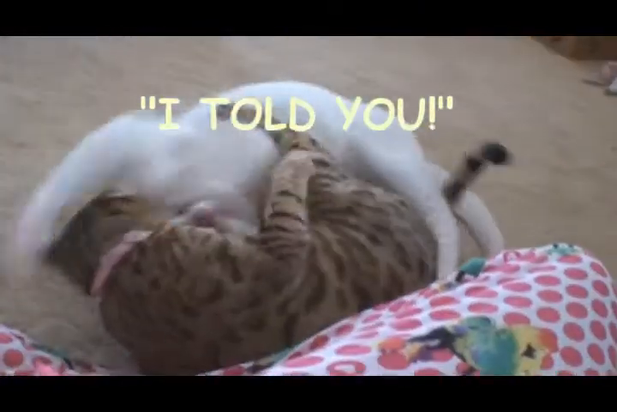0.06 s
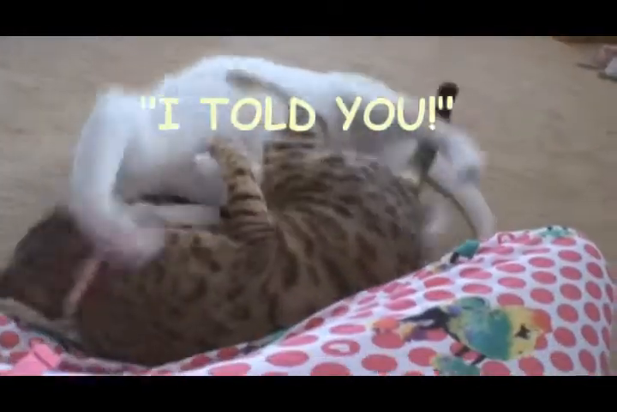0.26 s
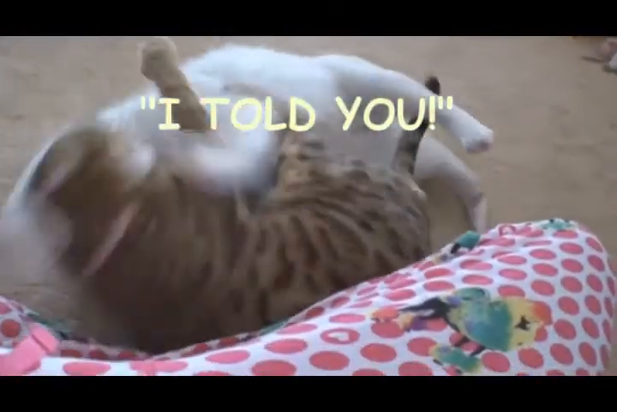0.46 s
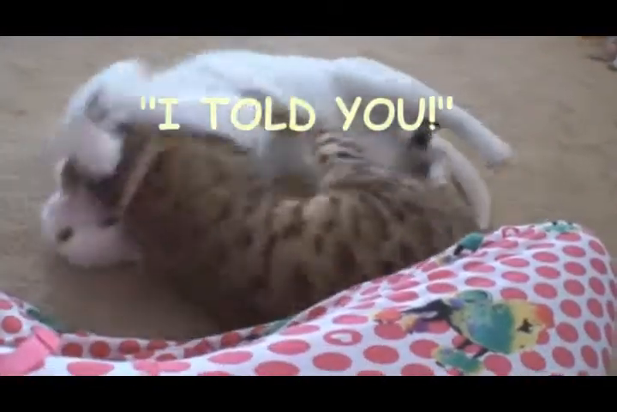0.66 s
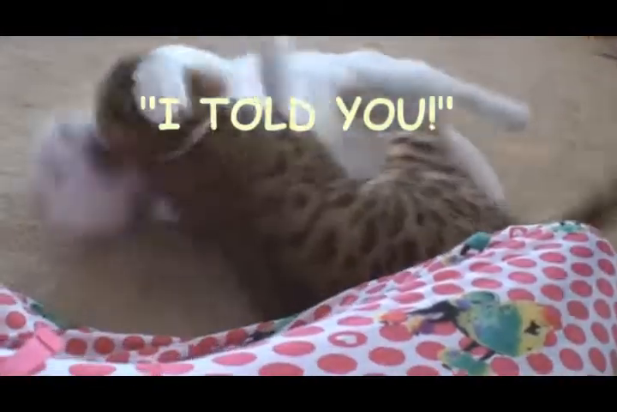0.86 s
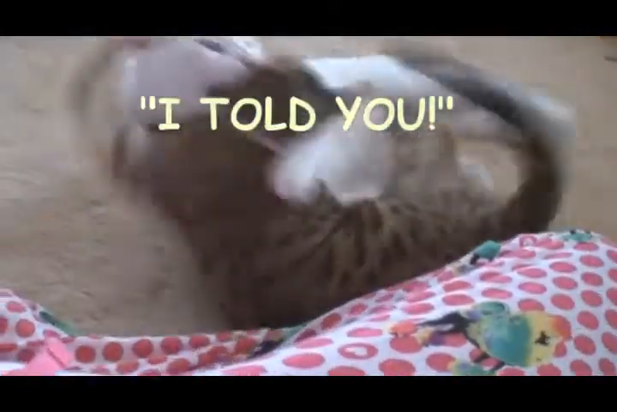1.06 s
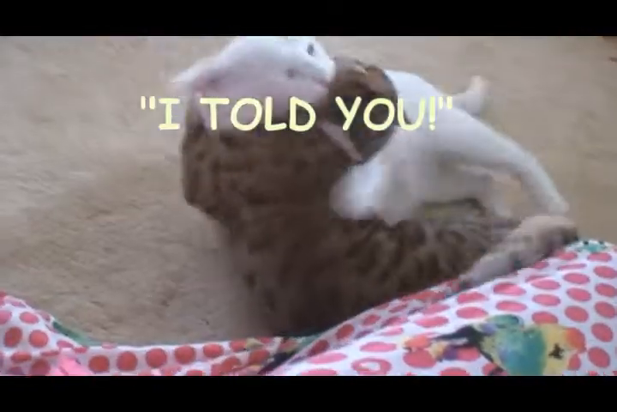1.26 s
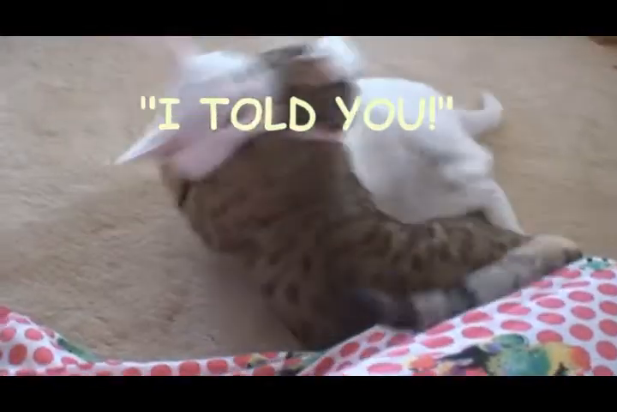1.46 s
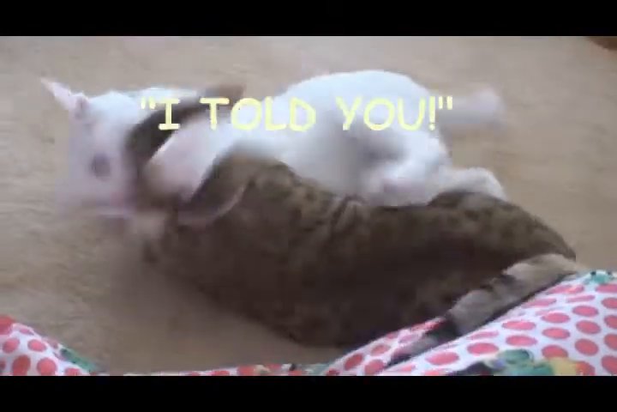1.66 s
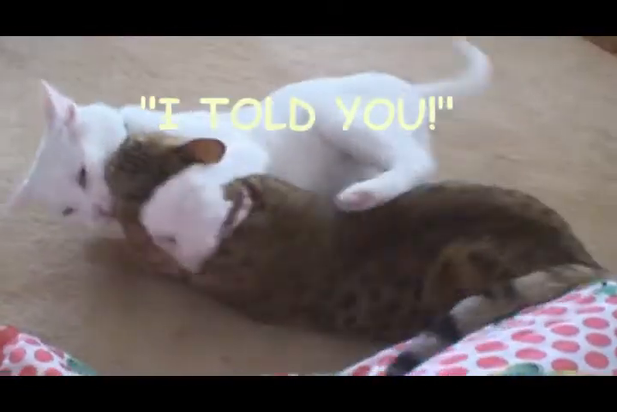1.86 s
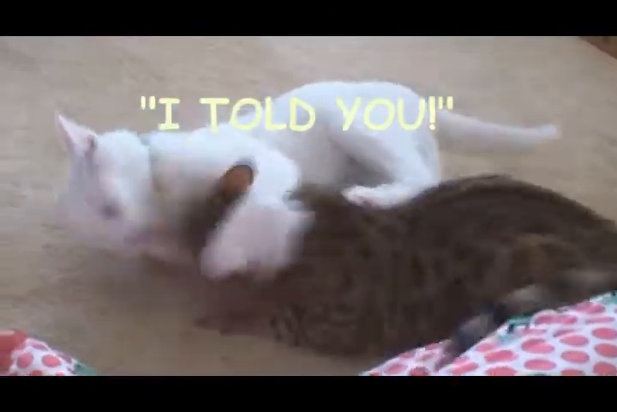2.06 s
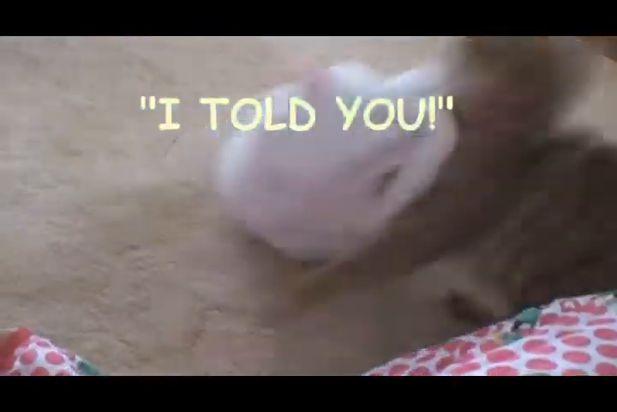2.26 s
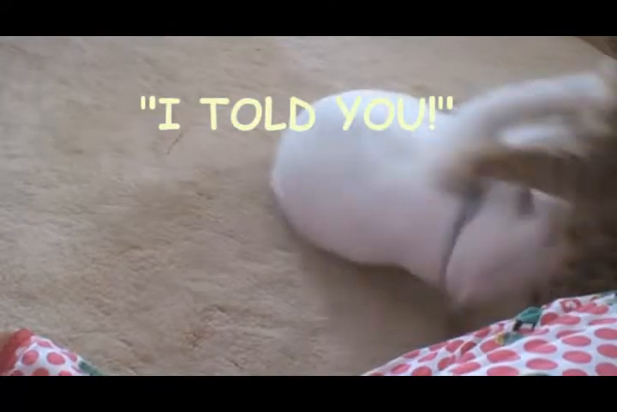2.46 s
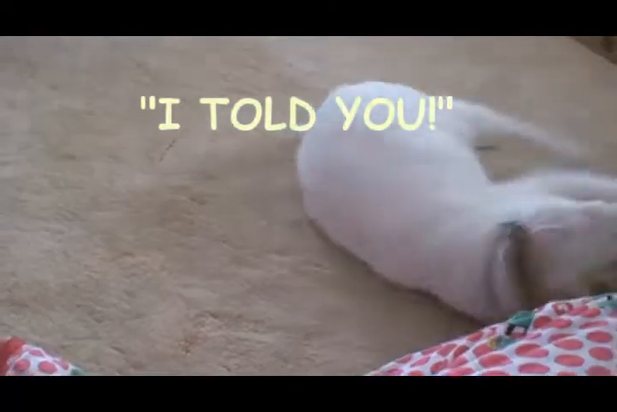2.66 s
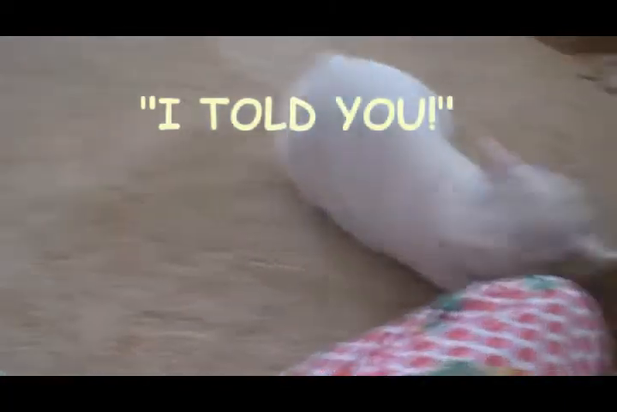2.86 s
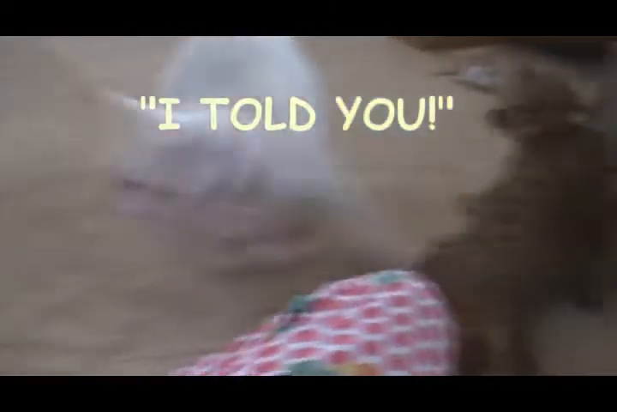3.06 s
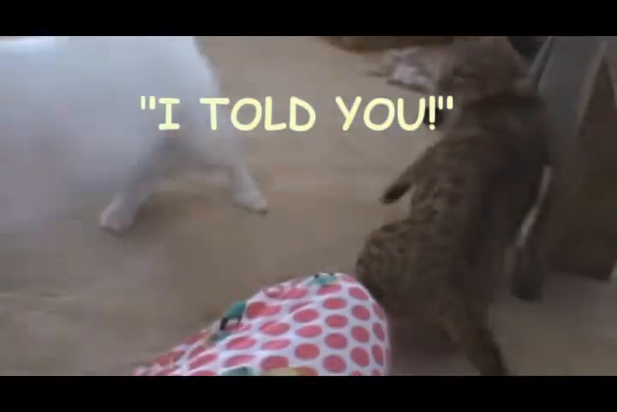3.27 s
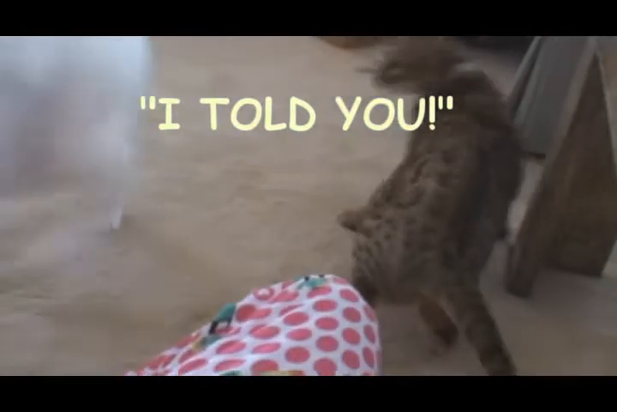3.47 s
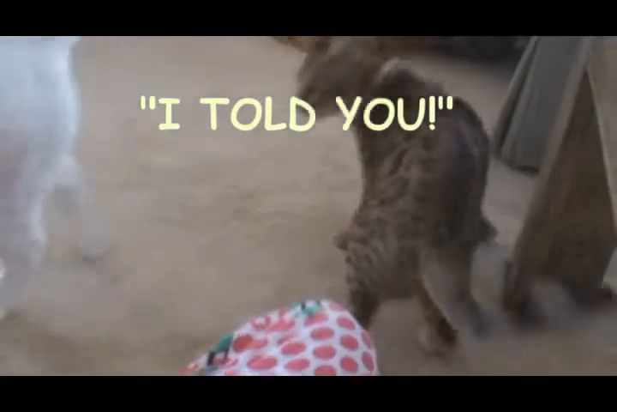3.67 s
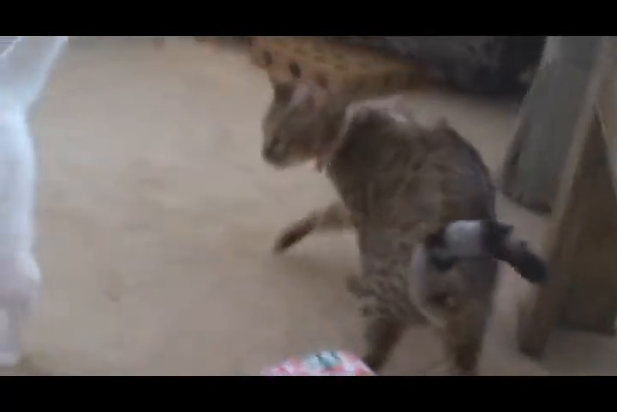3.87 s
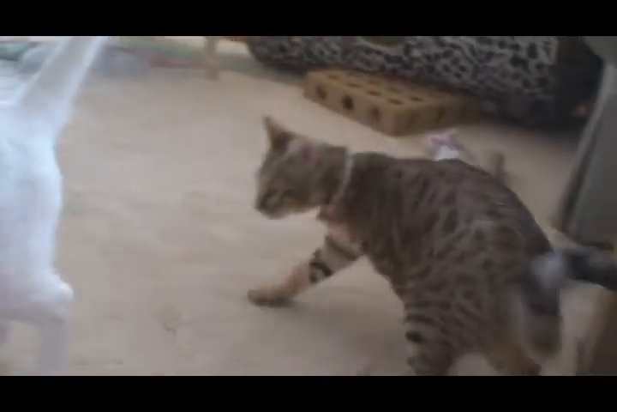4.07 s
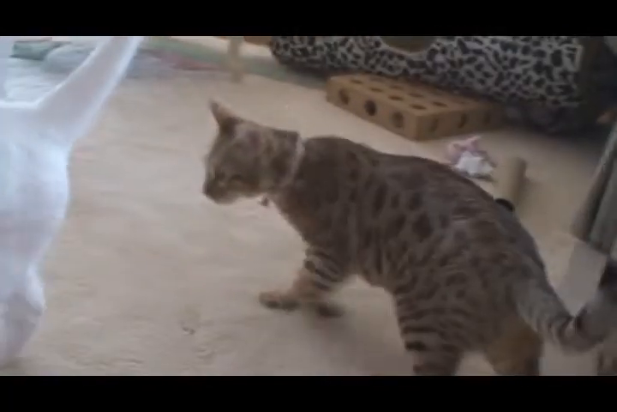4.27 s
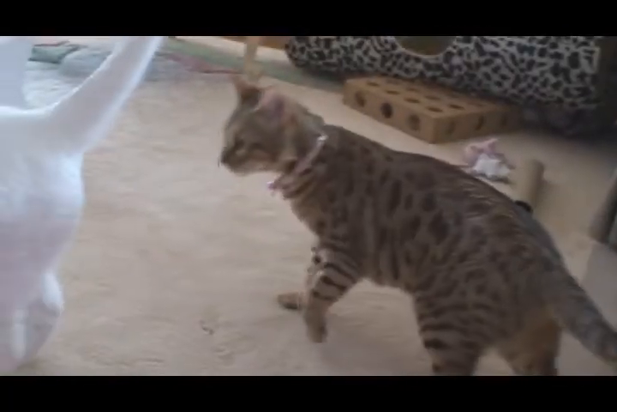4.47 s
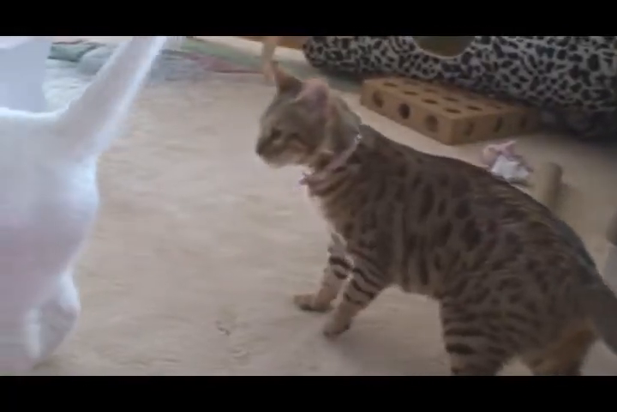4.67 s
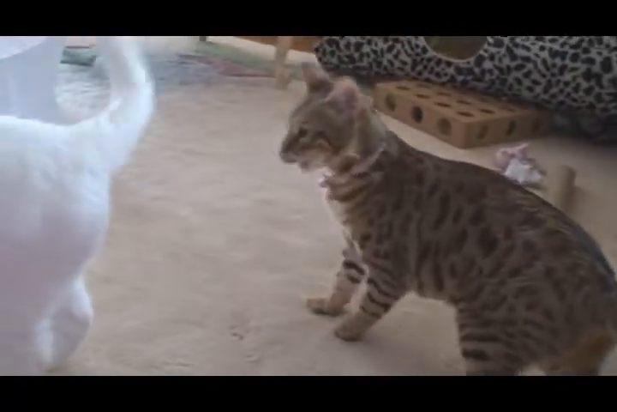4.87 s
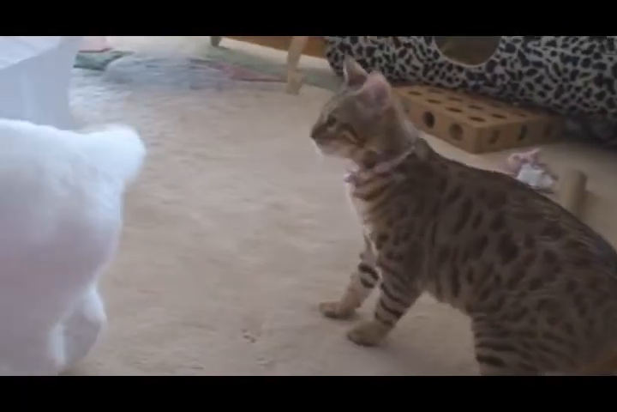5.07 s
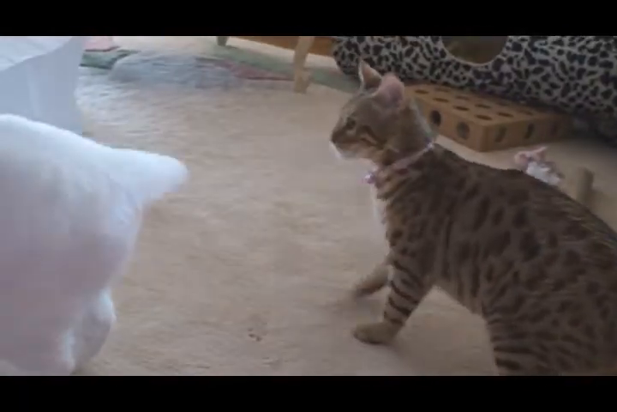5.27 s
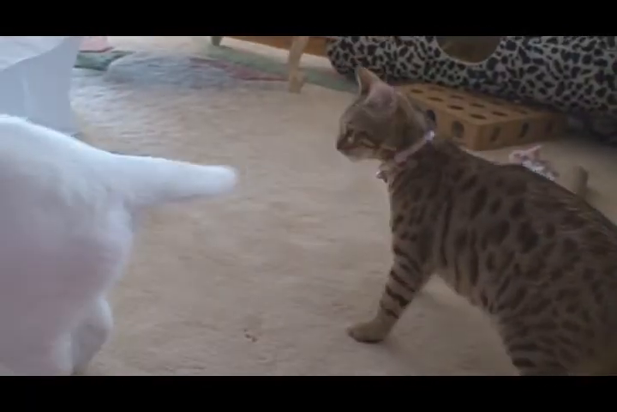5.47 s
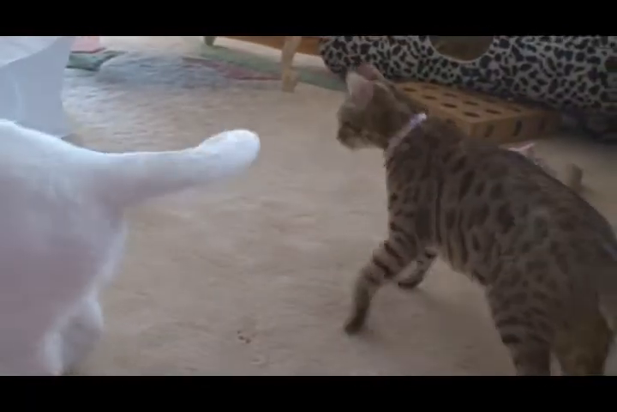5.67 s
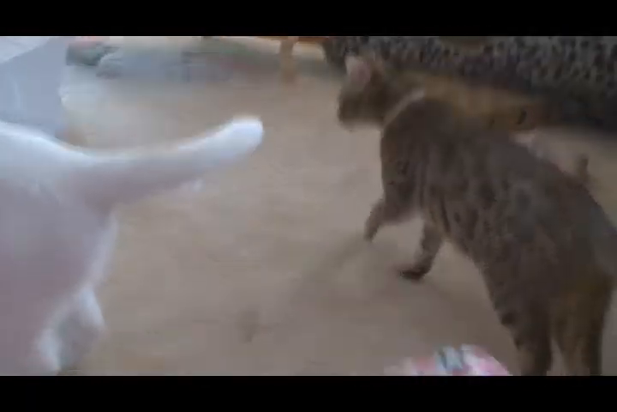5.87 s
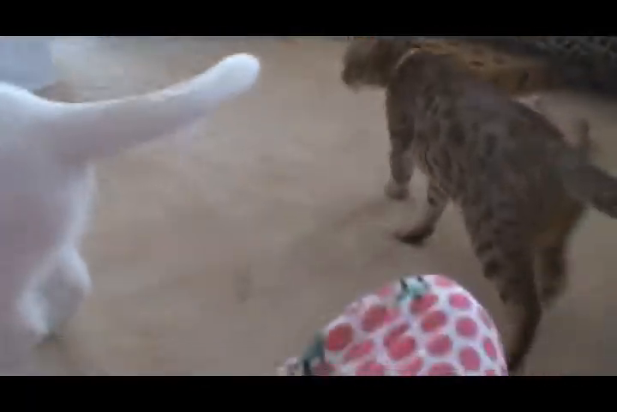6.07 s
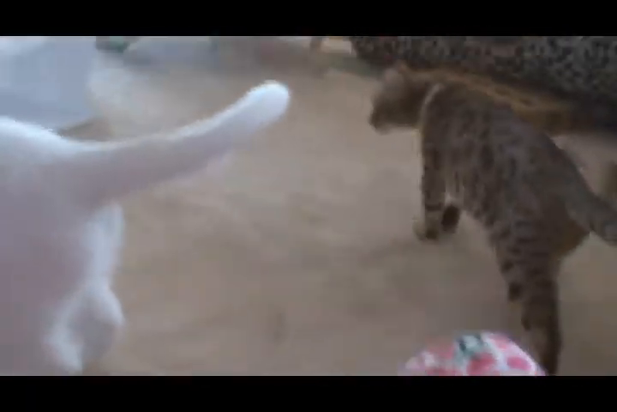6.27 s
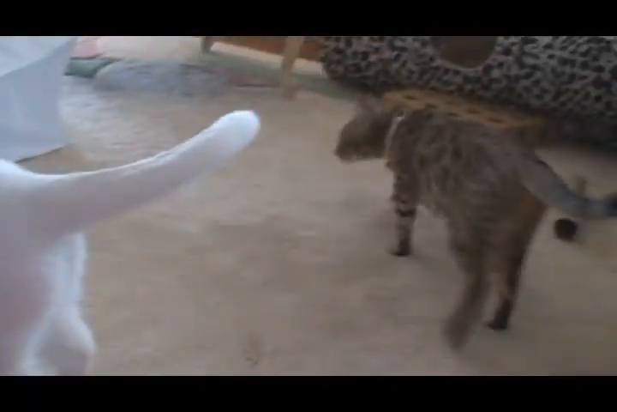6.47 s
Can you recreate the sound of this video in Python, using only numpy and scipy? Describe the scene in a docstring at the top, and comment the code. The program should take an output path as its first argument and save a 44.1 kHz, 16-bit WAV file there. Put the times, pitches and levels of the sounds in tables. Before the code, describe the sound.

Two cats wrestle on a carpet close to the microphone in a small room. A metal collar tag clinks lightly among fur rubbing, tiny claw snags and a sharp, hollow clack. The jingling grows louder and busier, then a body thumps the floor as they break apart. After a lull with a few faint clinks, the tag jingles brightly once more. A low hum and a faint fan run underneath.

```python
"""Cats wrestling on a carpet

Two cats wrestle close by in a small room. A metal collar tag strikes its ring, sings and
jiggles in bursts. Fur rubs the pile, claws snag and snap free, something hard clacks, and
a body thumps the floor as the cats break apart. A low hum and a faint fan fill the room."""
import sys
import numpy as np
from scipy import signal
from scipy.fft import rfft, irfft
from scipy.io import wavfile
from scipy.ndimage import uniform_filter1d

SR = 44100
rng = np.random.default_rng(int(sys.argv[2]) if len(sys.argv) > 2 else 0)


def master_out(mix):
    """Clip the mix to full scale and print it as 16-bit PCM to the path in sys.argv[1]."""
    frames = np.transpose(np.atleast_2d(mix))
    ceiling = np.clip(frames, -1, 1)
    pcm = np.round(ceiling * 32767).astype(np.int16)
    wavfile.write(sys.argv[1], SR, pcm)


N = 287046
TIME_S = np.arange(N) / SR
RING_TIME_S = np.arange(SR // 5) / SR
TAG_HZ = 4838  # main mode

# tag strikes, and two early room echoes of the loudest one (6 and 30 ms after it):
# t/s, main mode/dB, clang/dB, tick/dB, time until damped/s
STRIKES_AND_ECHOES = [(.189, -42.5, -43, -59, 0.018), (.3609, -30.5, -28, -58, 0.0026),
                      (.601, -36.5, -43, -51, 0.052), (.813, -47, -54, -54, 0.016),
                      (.853, -46, -50, -60, .024), (1.150, -38.5, -41, -66, 0.053),
                      (1.766, -31.5, -34, -62, .003), (1.926, -39, -44, -59, .0035),
                      (1.9474, -24, -27.5, -47, .0058), (1.96, -33.5, -51.5, -64, 0.061),
                      (2.35, -32.5, -26.5, -61, .0078), (2.4725, -18, -21, -58, 0.024),
                      (2.5019, -16.5, -20.5, -57, 0.0058), (2.6118, -25, -23, -22.5, 0.0023),
                      (2.627, -23.5, -24, -28, .064), (2.7485, -7.5, -13.5, -20, 0.0026),
                      (2.7547, -17, -17, -27, 0.0032), (2.7785, -29.5, -34.5, -35, .025),
                      (2.8353, -24, -23.5, -40.5, 0.017), (3.0496, -37, -47, -60.5, .006),
                      (3.2047, -25, -25.5, -44, 0.0056), (3.2712, -32.5, -27.5, -46, 0.0059),
                      (3.363, -32, -32, -33, 0.0025), (3.3869, -26, -35, -27.5, 0.025),
                      (3.465, -25, -42, -56, 0.011), (3.4681, -21, -27, -44, 0.0058),
                      (3.652, -54, -43, -71, 0.00525), (3.718, -50, -48, -77, 0.0032),
                      (3.833, -48, -52, -58, 0.002), (4.091, -43, -46, -68.5, 0.002),
                      (4.3871, -40, -35, -51, 0.0033), (4.434, -41.5, -39, -60, 0.0029),
                      (4.47, -42, -42, -62, 0.0026), (5.385, -32.5, -37, -45, 0.047),
                      (5.423, -32.5, -45, -46, .058), (5.4736, -34, -45, -50, 0.0132),
                      (5.4969, -24.5, -27, -33, 0.0054), (5.5271, -13.5, -15.5, -28, 0.0035),
                      (5.538, -24.5, -28, -31.5, .041), (5.573, -19, -15, -47, 0.0092),
                      (5.605, -22, -37, -44, 0.0051), (5.6444, -25.5, -23.5, -43, 0.0063),
                      (5.72, -19, -19.5, -38, 0.0039), (5.819, -25, -28, -57, 0.0016),
                      (5.8376, -30, -27, -52, 0.0043), (6.047, -38.5, -38, -56, 0.0035)]
# claw snags: t/s, level/dB
CLAW_SNAGS = [(0.0617, -37.5), (0.1343, -33.5), (.191, -30.5), (.197, -34.5), (.293, -40), (0.4411, -26.5),
              (.5623, -30), (0.85, -37.5), (.927, -37), (1.753, -43), (2.365, -48), (2.451, -34.5),
              (2.593, -44), (2.6208, -24), (5.5113, -35), (6.033, -36.5)]
# lunges, rolls and steps: peak t/s, rise/s, fade/s, tag shaking/dB, fur rubbing/dB
CAT_MOVES = [(.02, 0.066, 0.17, -50, -68), (.58, 0.041, 0.51, -58, -59), (1.148, 0.06, .16, -54.5, -63),
             (1.93, 0.17, 0.37, -56.5, -65), (2.37, 0.049, 0.099, -45, -51), (2.63, 0.13, 0.12, -45, -49),
             (2.78, .02, 0.09, -46, -49), (3.08, 0.062, 0.065, -47, -54), (3.23, .02, 0.3, -57, -60.5),
             (4.13, 0.098, 0.155, -63.5, -70), (5.39, 0.056, 0.12, -44, -53),
             (5.55, 0.047, 0.11, -33, -43.5), (5.85, 0.029, 0.059, -39.5, -51),
             (6.08, 0.042, 0.082, -48, -58.5)]


def tag_clinks(t60_s=0.2, tick_s=0.0025, stop_s=0.00031, muffled=0.052, bite=0.15, bite_s=0.0022):
    """The tag hits its ring, ticks, clangs and sings until damped; the loudest hit echoes twice."""
    tick_spectrum = [(500, -39), (1400, -17), (2400, -5), (3500, -7), (6000, 2), (7500, -1.5), (8500, -4.5),
                     (9300, 0), (10400, -6.5), (11500, -1.5)]  # metal contact: f/Hz, level/dB
    collar_side = [(0, -9), (2.8, -11), (3.3, -6.5), (4.1, 3), (5.53, -0.5), (5.6, -6), (6, -7.5)]  # collar position: t/s, L-R/dB
    out = np.zeros((2, N))
    for s, main_db, clang_db, tick_db, free_s in STRIKES_AND_ECHOES:
        pan_db = np.interp(s, *np.transpose(collar_side))
        main = ring([(TAG_HZ, 0, t60_s)], detune=0.0015) * amp(main_db + 0.3)
        upper = tag_clang() * amp(clang_db - 0.5)
        tone = phase_panned(main, 0.15, pan_db - 0.5) + phase_panned(upper, 0.78, pan_db)
        damping = muffled + (1 - muffled) * np.exp(-np.maximum(RING_TIME_S - free_s, 0) / stop_s)
        swing = damping + bite * np.exp(-RING_TIME_S / bite_s)  # widest at the onset
        tick = burst(tick_spectrum, tick_s) * amp(tick_db + 5)
        add(out, s, swing * tone + panned(tick, -3))
    return out


def tag_clang():
    """The tag's upper modes, shifted by where the ring presses on it."""
    upper_modes = [(4720, -7, 0.024), (5170, -9, 0.041), (5140, 7, 0.049), (5154, -4.5, 0.026),
                   (5444, -0.5, 0.067), (5720, 1, 0.031), (5877, 0.5, 0.034), (6510, -14.5, 0.091),
                   (7420, -23, 0.064), (8760, -29, .05)]  # metal tag: f/Hz, level/dB, t60/s
    return ring(upper_modes, scatter_db=2.5, detune=0.014)


def tag_jiggle(gain_db=-1, clang_db=0.5, t60_s=0.044, spots=20):
    """The shaken tag chatters lightly against its ring, hit at many different spots."""
    out = np.zeros((2, N))
    for _ in range(spots):
        main = ring([(TAG_HZ, 0, t60_s)], detune=0.003)
        chink = phase_panned(main, 0.15, -3.5) + amp(clang_db) * phase_panned(tag_clang(), 0.46, -5.5)
        touches = contacts(per_s=14, spread_db=3)
        out += signal.oaconvolve(touches[None], chink[:, :SR // 10], axes=1)[:, :N]
    return amp(gain_db) * tag_shaking() * evened(out)


def tag_shaking(jolt_s=0.0066, rattle_db=-23, rattle_s=0.091):
    """Jiggle envelope: each move shakes the tag, and a rattle trails each strike or echo."""
    moves = sum((amp(db) * swell(s, rise_s, fade_s)) ** 2 for s, rise_s, fade_s, db, _ in CAT_MOVES)
    rattles = sum((amp(clang_db + rattle_db) * swell(s + jolt_s, jolt_s, rattle_s)) ** 2
                  for s, _, clang_db, _, _ in STRIKES_AND_ECHOES)
    return np.sqrt(moves + rattles)


def collar_slides(t60_s=0.014):
    """The small ring scrapes along its loop and sings above the tag's main mode."""
    slides = [(0.533, 0.073, -58, 6130), (0.609, 0.082, -53, 6230), (0.679, 0.066, -47, 6270),
              (0.743, .12, -59, 6100), (1.07, 0.036, -60, 5600), (1.14, 0.11, -56, 5960),
              (1.863, 0.055, -50.5, 6120), (2.461, 0.037, -43, 5950), (2.561, .02, -42, 5950),
              (2.602, 0.021, -43, 6030), (2.87, .025, -44.5, 6380)]  # ring scrapes: peak t/s, length/s, level/dB, f/Hz
    out = np.zeros(N)
    for s, length_s, db, hz in slides:
        t = np.arange(-1.5 * length_s, 1.2 * length_s, 1 / SR)
        friction = rng.standard_normal(len(t))
        song = signal.oaconvolve(friction, ring([(hz, 0, t60_s)]).real)[:len(t)]
        add(out, s + t[0], amp(db) * evened(song) * np.exp(-(2 * t / length_s) ** 2))
    return panned(out, -4)


def carpet_scuffs(rub_db=2.5, snap_s=0.0011):
    """Fur and paws drag over the pile in fine grains; claws catch and snap free."""
    fur_spectrum = [(300, -17), (1000, -1), (2500, -3), (4000, 5), (6000, 7.5), (7500, 4), (9500, 0),
                    (11500, -10.5)]  # rubbed fur: f/Hz, level/dB
    snap_spectrum = [(800, -28), (2000, 3), (4500, 1), (7000, 1), (9300, 0), (11500, -3)]  # claw snap: f/Hz, level/dB
    grains = contacts(per_s=3000, spread_db=4.5)
    out = amp(rub_db) * carpet_rubbing() * evened(coloured(grains, fur_spectrum))
    for s, db in CLAW_SNAGS:
        add(out, s, amp(db) * burst(snap_spectrum, snap_s))
    return panned(out, -4.5)


def carpet_rubbing(grip_s=0.0044, drag_db=-23.5, drag_s=0.019):
    """Rub envelope: each move brushes the pile, and freed claws drag on after a snag."""
    moves = sum((amp(db) * swell(s, rise_s, fade_s)) ** 2 for s, rise_s, fade_s, _, db in CAT_MOVES)
    drags = sum((amp(db + drag_db) * swell(s + grip_s, grip_s, drag_s)) ** 2 for s, db in CLAW_SNAGS)
    return np.sqrt(moves + drags)


def clacks(gain_db=1):
    """A hard object is knocked and rings short and hollow; light touches sound lower."""
    knocks = [(0.1348, -31, 0.93), (0.4429, -12.5, 0.93), (.4535, -27, 0.74), (.728, -35, 0.558),
              (.757, -35, 0.576), (1.177, -34.5, 0.57)]  # hard knocks: t/s, level/dB, pitch ratio
    object_modes = [(490, -12, 0.026), (690, -16, 0.049), (880, -7, 0.019), (1207, 1, 0.023),
                    (1520, 3.5, 0.03), (1940, 3.5, 0.027), (2190, -9.5, 0.028), (3960, 0, 0.0079),
                    (5200, -4, 0.0072)]  # knocked object: f/Hz at ratio 1, level/dB, t60/s
    out = np.zeros(N)
    for s, db, pitch in knocks:
        modes = [(hz * pitch, mode_db, t60_s) for hz, mode_db, t60_s in object_modes]
        add(out, s, amp(db + gain_db) * ring(modes, rise_s=0.00041).real)
    return panned(out, 8.7)


def body_bumps(slap_s=0.0099):
    """A body lands on the right: a brief slap and a floor boom, duller the softer the push."""
    landings = [(1.175, -38, 150, -45.5), (1.572, -45, 130, -49.5), (2.512, -30.5, 125, -39),
                (2.54, -34.5, 110, -44), (2.978, -19.5, 640, -33), (2.994, -33, 800, -39),
                (3.016, -30, 1100, -30.5), (3.045, -32, 750, -37), (3.087, -55, 900, -39),
                (5.36, -35, 110, -61), (5.477, -34, 130, -59)]  # bodies and paws: t/s, boom/dB, push cutoff/Hz, slap/dB
    floor_modes = [(133, -3.5, 0.082), (164.4, -6, 0.14), (202, -5.5, 0.14), (251, 0, 0.14),
                   (293, 2.5, 0.15), (346, 6, 0.061), (440, -8, 0.061), (523, -2.5, .12), (632, -1, 0.11),
                   (742, 1, 0.13)]  # floor: f/Hz, level/dB, t60/s
    slap_spectrum = [(100, -10), (250, 4.5), (420, 4.5), (700, -3), (1000, -1.5), (1600, -7.5),
                     (3000, -12.5), (8000, -47)]  # body brushing the carpet: f/Hz, level/dB
    out = np.zeros(N)
    for s, boom_db, cutoff_hz, slap_db in landings:
        modes = [(hz, db - 20 * np.log10(1 + (hz / cutoff_hz) ** 4), t60_s)
                 for hz, db, t60_s in floor_modes]
        boom = ring(modes, rise_s=0.0029).real
        slap = burst(slap_spectrum, slap_s)
        add(out, s, amp(boom_db) * boom + amp(slap_db) * slap)
    return panned(out, -18.5)


def reflections(x, first_s=0.0015, per_s=2500):
    """Sparse room echoes of random sign, each band dying at its own rate."""
    decay = [(150, 0.48), (1000, 0.077), (5000, 0.24), (12000, 0.22)]  # room decay: f/Hz, t60/s
    t = np.arange(SR // 2) / SR
    signs = rng.choice([-1., 1.], (2, len(t)))
    taps = signs * (rng.random(signs.shape) < per_s / SR) * (t > first_s)
    hz, frame_s, bands = signal.stft(taps, SR, nperseg=256)
    fade = amp(-60 * frame_s / value_at(decay, hz)[:, None])
    tail = signal.istft(bands * fade, SR, nperseg=256)[1]
    return signal.fftconvolve(x.mean(0)[None], tail / np.linalg.norm(tail[0]), axes=1)[:, :N]


def fan_and_hum(left_db=-50.5, right_db=-45.5, correlation=0.22):
    """Fan air, a wavering low hum and thin motor whines."""
    air_left = [(20, -18), (45, -5), (100, -3.5), (200, -1), (600, 0.5), (1000, -1), (1900, -5), (2600, -9),
                (4000, -14.5), (5200, -16.5), (7000, -20.5), (12000, -28.5)]  # fan air, left: f/Hz, level/dB
    air_right = [(20, -11), (45, 0.5), (80, 2.5), (160, 2), (330, 1.5), (550, -5.5), (900, -9),
                 (1500, -15.5), (4000, -21), (5200, -25.5), (7000, -30.5), (12000, -35)]  # fan air, right: f/Hz, level/dB
    hum_lines = [(58.9, -55, -22, 6.5), (119.3, -62.5, -27.5, 4.1), (234.93, -60, -28.5, 9.85),
                 (300.2, -95, -20, 4.4), (702, -69, 6, 2.5), (780, -66, 13, 2.2), (858, -67.5, 30, 0.95),
                 (1682, -66, 13.5, 3.4)]  # hum and whines: f/Hz, level/dB, L-R/dB, linewidth/Hz
    left, other = rng.standard_normal((2, N))
    right = correlation * left + np.sqrt(1 - correlation ** 2) * other
    out = np.array([amp(left_db) * coloured(left, air_left), amp(right_db) * coloured(right, air_right)])
    for hz, db, pan_db, width_hz in hum_lines:
        drift_rad = np.cumsum(rng.standard_normal(N)) * np.sqrt(np.pi * width_hz / SR)
        line = np.sin(2 * np.pi * hz * TIME_S + uniform_filter1d(drift_rad, size=2000))
        out += panned(amp(db) * evened(line), pan_db)
    return out


def ring(modes, scatter_db=0, detune=0, rise_s=0.00064):
    """Decaying modes as a normalised complex wave; level and pitch can scatter per blow."""
    hz, db, t60_s = np.transpose(modes)[:, :, None]
    weight, load = rng.standard_normal((2, *hz.shape))
    size = amp(db + scatter_db * weight)
    phasors = np.exp(2j * np.pi * (hz * (1 + detune * load) * RING_TIME_S + rng.random(hz.shape)))
    attack = 1 - np.exp(-(RING_TIME_S / rise_s) ** 2)
    decay = amp(-60 * RING_TIME_S / t60_s)
    return attack * (size * decay * phasors).sum(0) / np.linalg.norm(size)


def burst(spectrum, fade_s):
    """Noise puff: instant onset, exponential fade."""
    return coloured(rng.standard_normal(len(RING_TIME_S)), spectrum) * np.exp(-RING_TIME_S / fade_s)


def contacts(per_s, spread_db):
    """Random train of tiny, uneven impacts."""
    size = amp(spread_db * np.minimum(rng.exponential(1, N), 3)) * rng.choice([-1, 1], N)
    return size * (rng.random(N) < per_s / SR)


def swell(peak_s, rise_s, fade_s):
    """Motion envelope: Gaussian rise, exponential fade."""
    early_s, late_s = np.maximum(peak_s - TIME_S, 0), np.maximum(TIME_S - peak_s, 0)
    return np.exp(-np.minimum((early_s / rise_s) ** 2 + late_s / fade_s, 30))


def coloured(x, spectrum):
    """Shapes white noise to a spectrum at equal power."""
    gain = evened(amp(value_at(spectrum, np.fft.rfftfreq(len(x), 1 / SR))))
    return irfft(rfft(x) * gain, len(x))


def panned(x, pan_db):
    """Stereo split by L-R level, mean gain 1."""
    gains = amp([[pan_db], [0]])
    return x * gains / gains.mean()


def phase_panned(wave, lead_rad, pan_db):
    """Complex wave to stereo, left leading in phase."""
    return panned(np.array([wave * np.exp(1j * lead_rad), wave]).real, pan_db)


def amp(db):
    return 10 ** (np.asarray(db) / 20)


def evened(x):
    """Scales to unit RMS."""
    return x / np.sqrt(np.mean(x ** 2) + 1e-20)


def value_at(curve, hz):
    curve_hz, values = np.transpose(curve)
    return np.interp(np.log(hz + 1), np.log(curve_hz), values)


def add(mix, s, sound):
    part = mix[..., max(round(s * SR), 0):][..., :sound.shape[-1]]
    part += sound[..., :part.shape[-1]]


def scene(tag_room_db=-4, scuffle_room_db=-7.5, bump_room_db=-4):
    """Tag, scuffle and bumps with their echoes, over fan and hum."""
    tag = tag_clinks() + tag_jiggle() + collar_slides()
    scuffle = carpet_scuffs() + clacks()
    bumps = body_bumps()
    right_echoes = panned(reflections(amp(tag_room_db) * tag + amp(bump_room_db) * bumps), -9.5)
    scuffle_echoes = amp(scuffle_room_db) * reflections(scuffle)
    return tag + scuffle + bumps + right_echoes + scuffle_echoes + fan_and_hum()


def record(dry):
    """Soft-clips the loudest peaks and limits the band."""
    ceiling, cutoff_hz = 0.85, 11900
    lowpass = signal.firwin(255, cutoff_hz, window=("kaiser", 8), fs=SR)
    return signal.oaconvolve(ceiling * np.tanh(dry / ceiling), lowpass[None], "same")


dry = scene()
out = record(dry)
master_out(out)
```